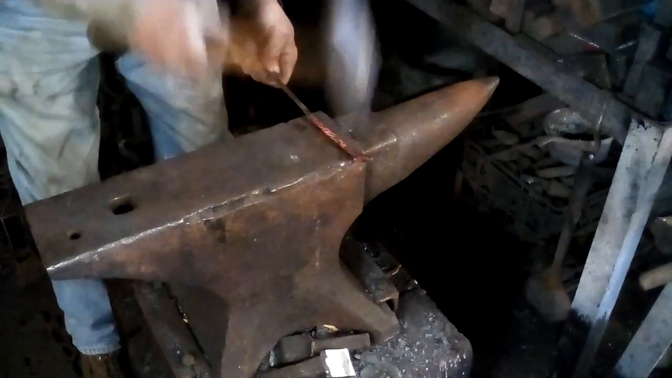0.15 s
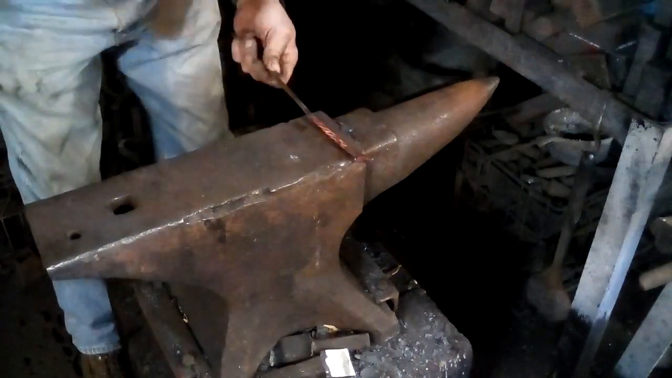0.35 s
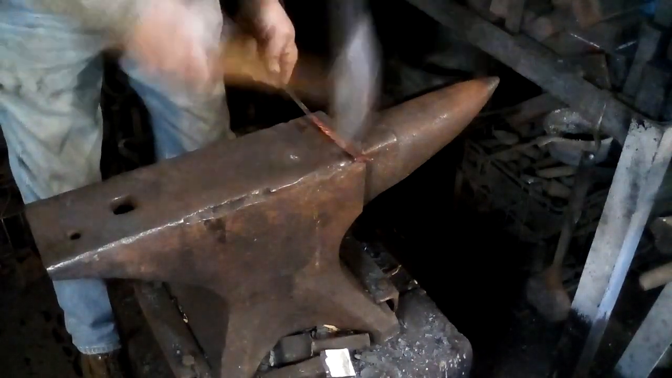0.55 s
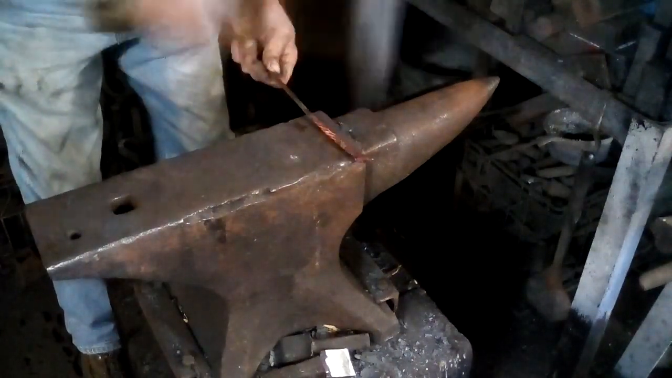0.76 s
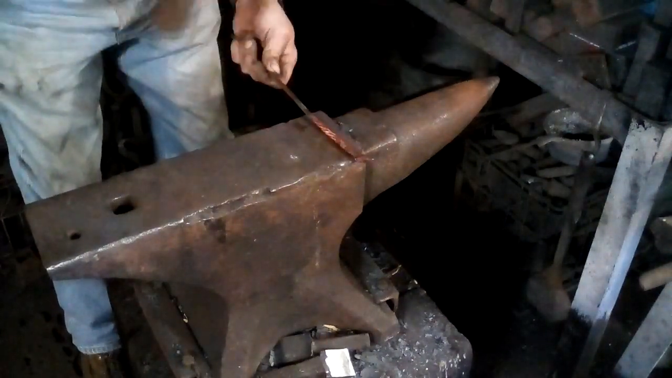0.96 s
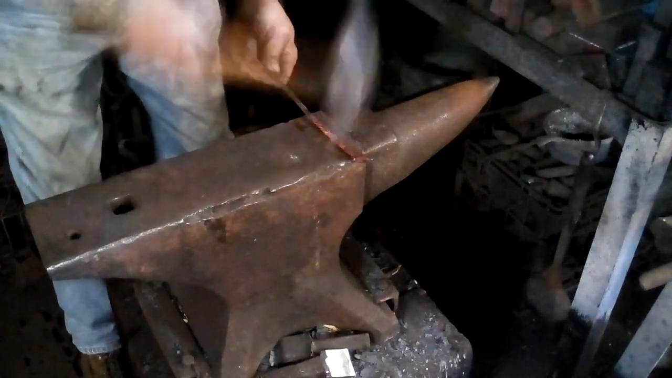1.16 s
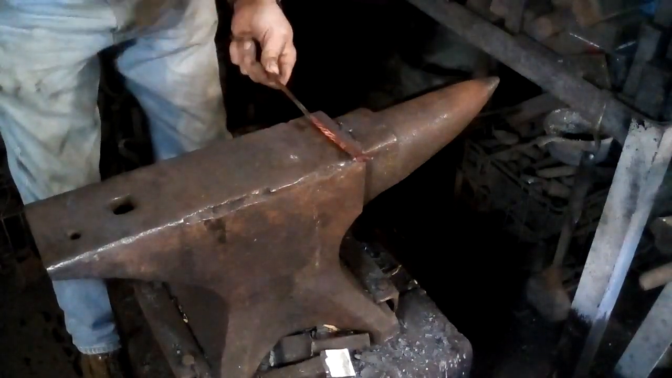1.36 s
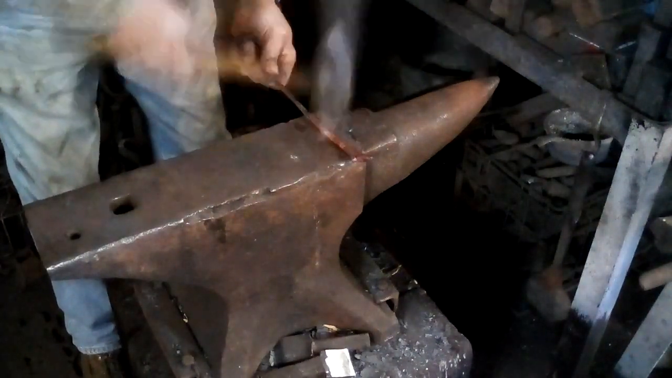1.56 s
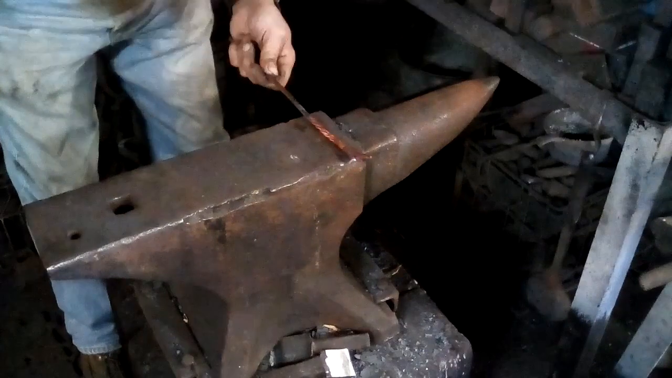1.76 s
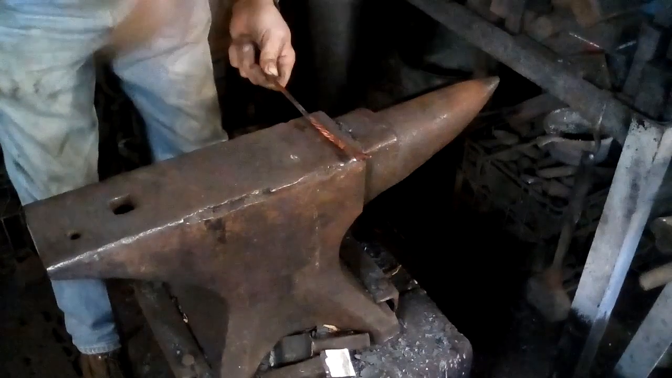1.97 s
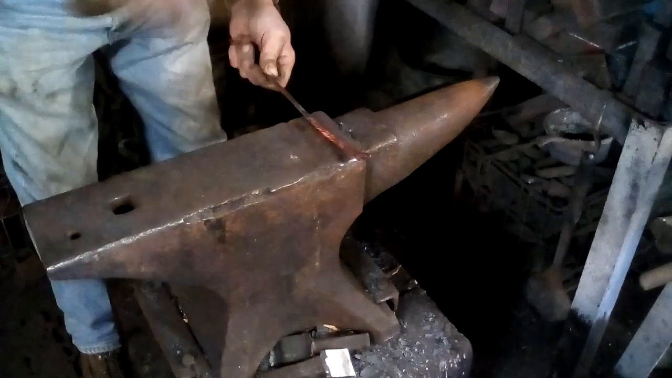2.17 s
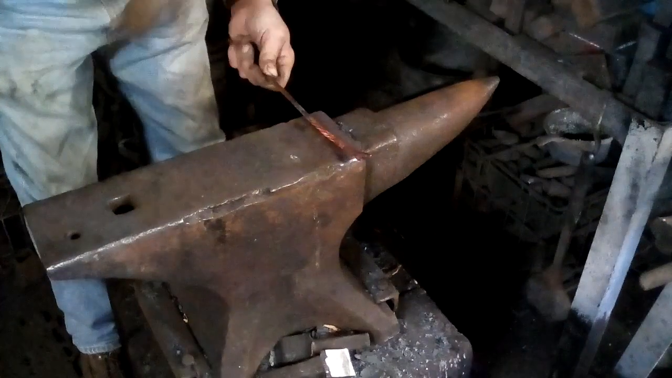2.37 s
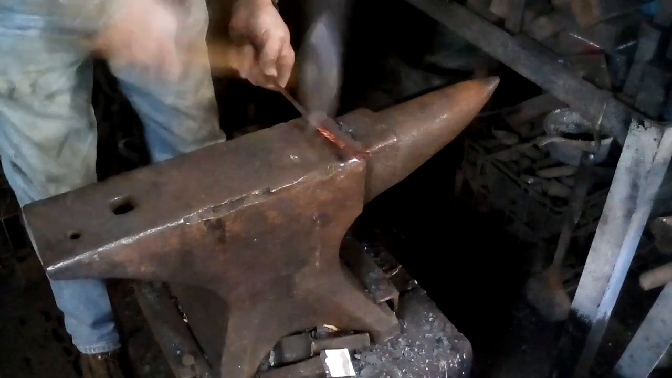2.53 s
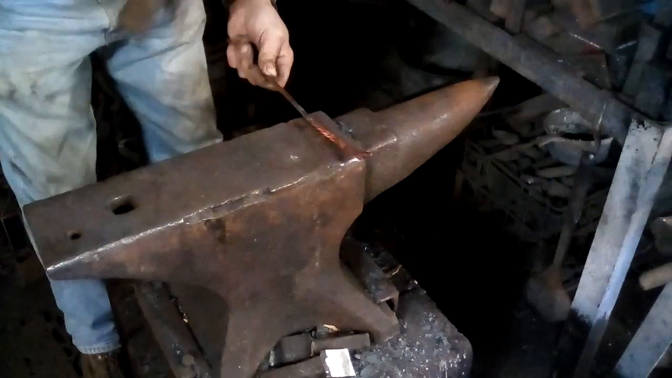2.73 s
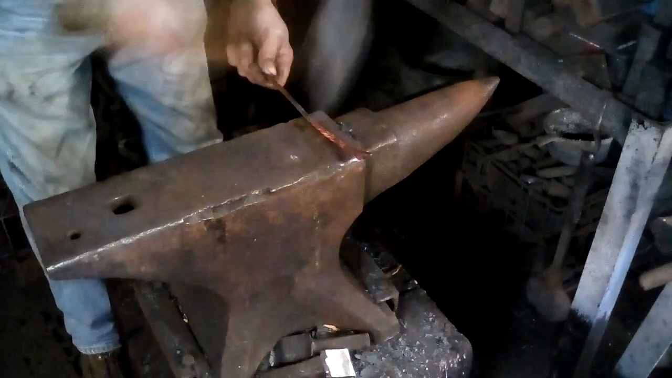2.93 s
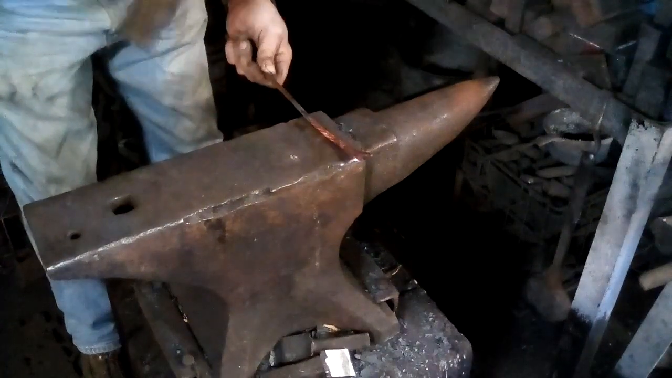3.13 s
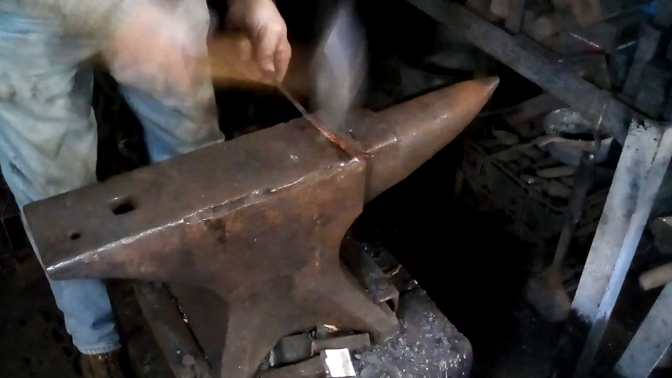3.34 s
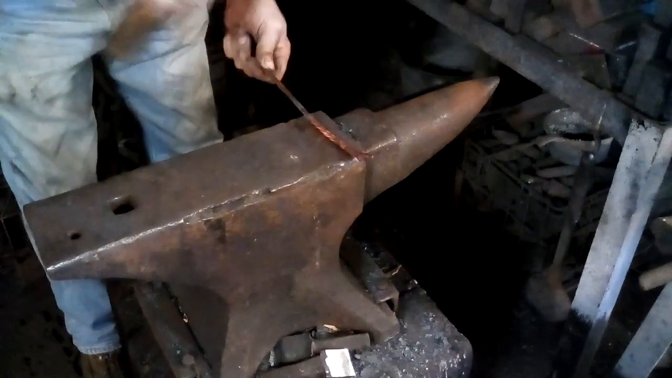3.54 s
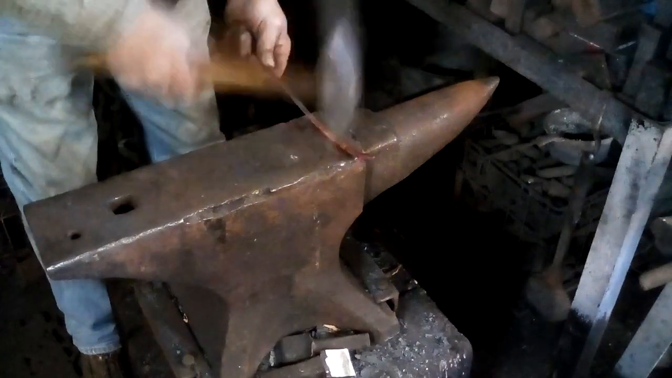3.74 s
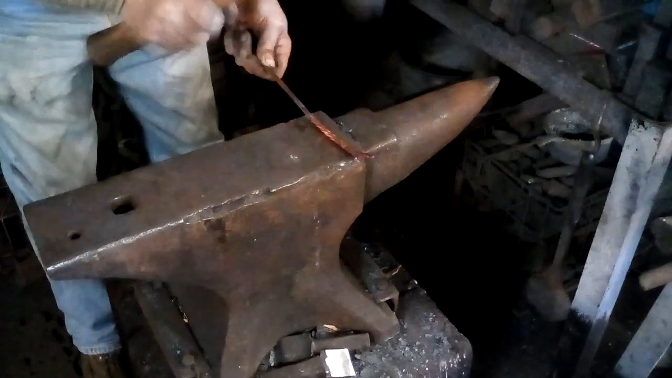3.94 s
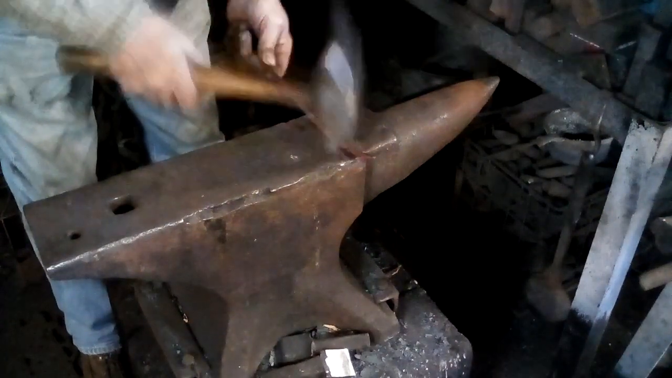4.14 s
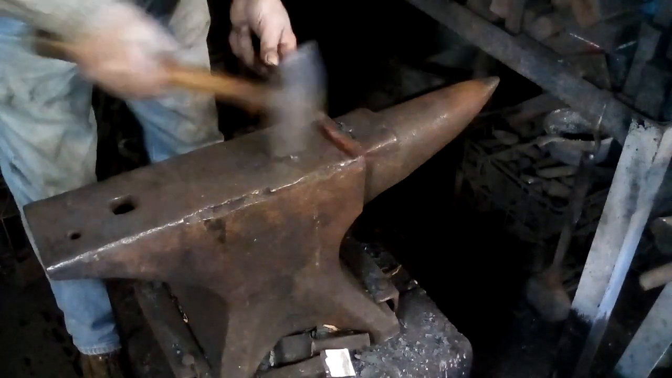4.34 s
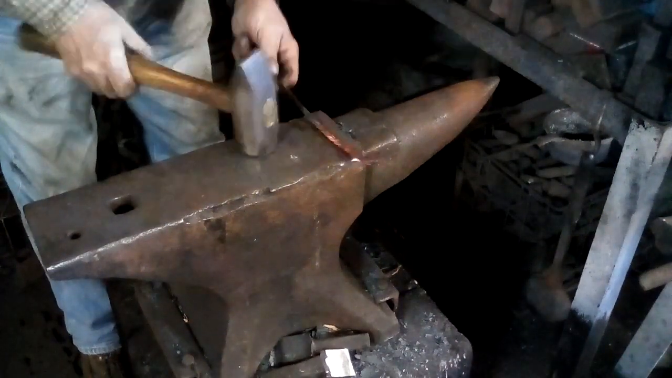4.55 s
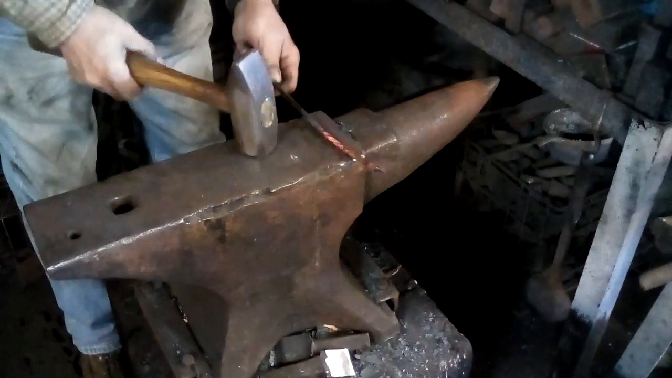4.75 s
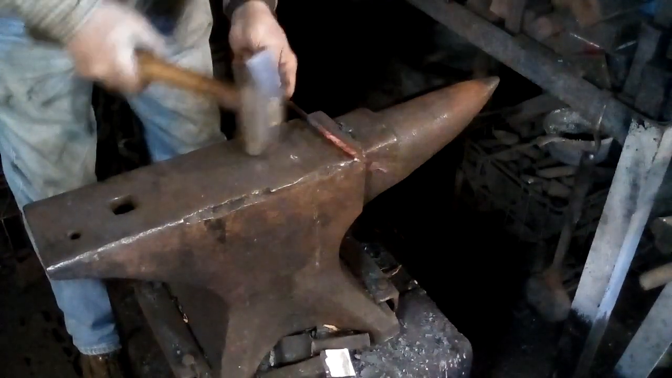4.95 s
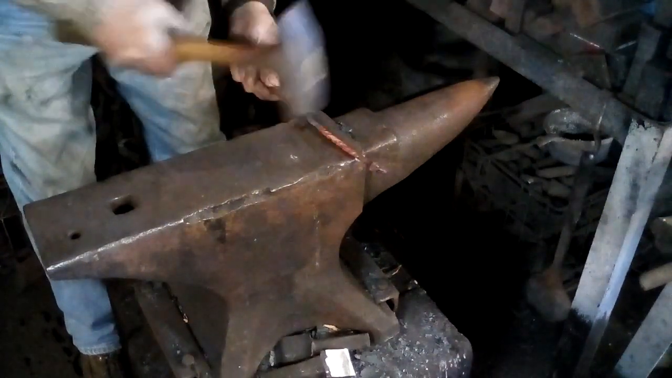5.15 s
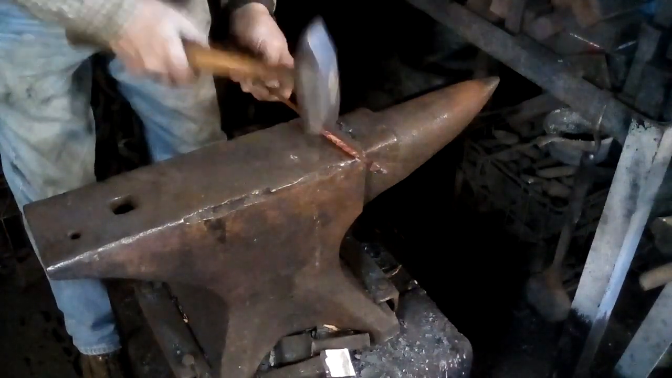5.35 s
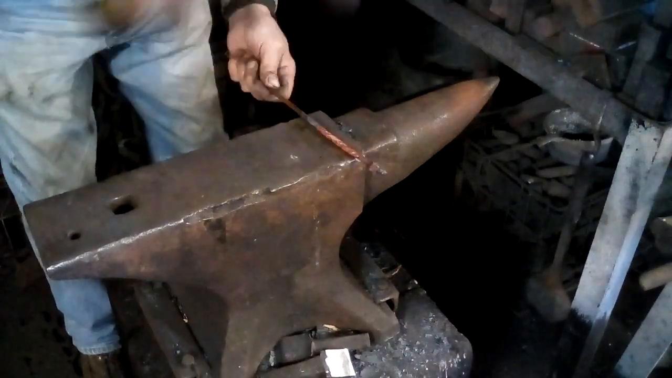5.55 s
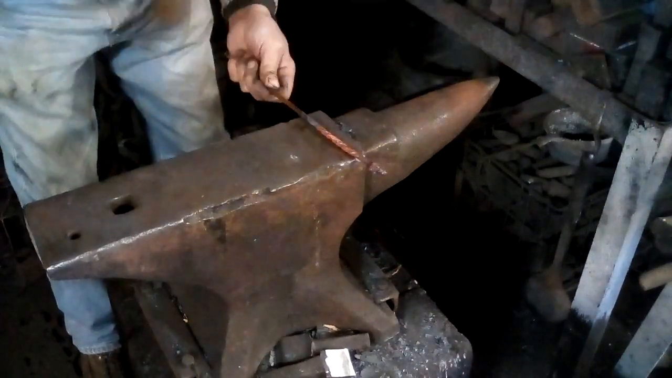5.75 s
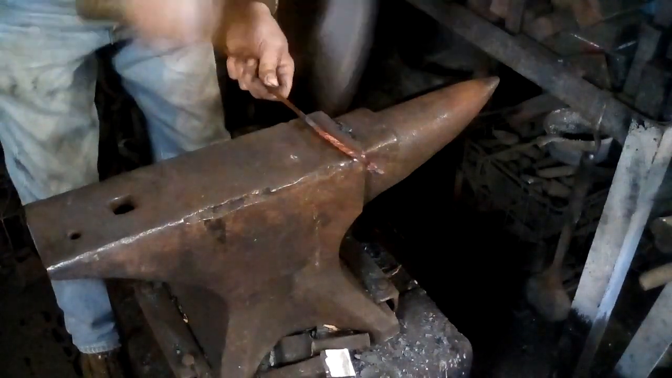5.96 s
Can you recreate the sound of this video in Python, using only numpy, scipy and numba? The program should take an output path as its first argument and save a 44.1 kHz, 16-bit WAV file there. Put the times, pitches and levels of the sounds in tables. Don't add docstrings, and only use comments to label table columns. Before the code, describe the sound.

A small microphone sits about a metre from an anvil in a stone workshop, over quiet low draught and thin hiss. A light rod knock sounds at 0.0 s. Hard hammer blows follow at about 0.7, 1.2, 1.6, 2.1, 2.5, 2.95, 3.4 and 3.8 s: sharp clank, short stump thud, steely shimmer and a dense tail under a second. Ringing grows through the fourth and fifth; the sixth is hardest, with a long, clear high ring, and the next is duller. A soft, thuddy blow lands at 4.2 s. The hammer bounces three times on bare steel at 4.45, 4.52 and 4.56 s, the last weakest. Faint cloth rustles near 5.0 s, a light tap rocks the stand at 5.4 s, cloth moves again at 5.7 s, and a full blow falls at 5.94 s, cut off early. Peaks are squashed, tails swell back, and a very faint high whistle briefly precedes blows.

```python
import sys
import numpy as np
from scipy import signal
from scipy.fft import rfft, irfft, next_fast_len
from scipy.io import wavfile
from scipy.ndimage import uniform_filter1d, minimum_filter1d
from numba import njit

SR = 44100
rng = np.random.default_rng(int(sys.argv[2]) if len(sys.argv) > 2 else 0)


def natural_amplitude(level_db):
    exponent = np.asarray(level_db, float) / 20
    return 10 ** exponent


def materialize(psi):
    bounded = np.clip(np.atleast_2d(psi).T, -1, 1)
    quanta = np.round(bounded * 32767).astype(np.int16)
    wavfile.write(sys.argv[1], SR, quanta)


N = 269010

BLOCK_S = 0.02
RING_S = 0.75
FLIGHT_S = 0.0016
SCATTER_DB = 1.5
TAIL_PER_PEAK = 0.84

# f/Hz, density/dB per Hz
AIR_SPECTRUM = [(25, -24), (60, -6), (150, -0.5), (240, -3), (420, -7.5), (700, -14), (1800, -19),
                (3000, -22.5), (4000, -21), (6500, -26.5), (9000, -36), (15000, -27.5)]
# f/Hz, level/dB
WHISTLE_TONES = [(6800, -67.5), (14700, -69.5)]
# middle t/s, half length/s, level/dB
RUSTLES = [
    (4.996, 0.16, -62),
    (5.716, .1, -57),
]
# f/Hz, density/dB per Hz
CLOTH_SPECTRUM = [(100, -10), (400, -6), (1200, -20), (2600, -13), (3300, -18), (4000, -5.5), (5200, -16),
                  (8000, -40)]

# f/Hz, density/dB per Hz
BLOW_TAIL = [(40, -18.5), (100, -6.5), (200, -3), (570, -0.5), (900, -2.5), (1400, -6.5), (2100, -3),
             (3000, -13), (3800, -10), (5200, -16.5), (7500, -26.5), (10000, -26), (15000, -27)]
SKIP_TAIL = [(40, -27.5), (115, -7.5), (200, 1.5), (640, -5), (1200, -9), (2400, -6.5), (3300, -9.5),
             (4300, -19), (5500, -19.5), (7500, -44), (10000, -45), (15000, -68.5)]
KNOCK_TAIL = [(40, -19), (120, 0), (300, -2), (700, -4.5), (1400, -13.5), (3000, -18), (4400, -22.5),
              (6500, -25), (10000, -27), (15000, -20.5)]
ROCK_TAIL = [(40, -20), (120, -0.5), (300, -9.5), (700, -17), (1400, -31.5), (3000, -28.5), (4400, -20),
             (6500, -23), (10000, -25.5), (15000, -19.5)]
# f/Hz, t60/s
TAIL_T60 = [(80, 0.92), (300, 0.64), (1500, 0.55), (4000, 0.52), (8000, 0.31), (15000, 0.19)]
# delay/s, spread/s, level/dB
FAR_WALL = (0.08, 0.012, 1)
# f/Hz, width/Hz, level/dB
ANVIL_MODES = [(351.4, 43, 3), (572, 26, 4.5), (888, 52, 4), (1272, 20, 4.5), (1885, 110, 6.5),
               (2321, 63, 5), (3518, 45, 6.5), (4020, 275, 8), (6270, 160, 13.5), (9780, 180, 9.5),
               (10830, 100, 1), (12300, 200, -5.5), (6990, 380, 7)]

# t/s, peak level/dB, head ring level/dB, thud level/dB, crack level/dB
BLOWS = [
    (0.694, -7, -33.5, 8, 11),
    (1.17, -3.5, -36.5, 5, 5),
    (1.618, -3.5, -33.5, 5.5, 6),
    (2.07, -2.5, -24.5, 4.5, 8.5),
    (2.511, -3, -22.5, 5, 4.5),
    (2.953, 3, -18.5, -7, 1),
    (3.381, -0.5, -38.5, -2.5, 8),
    (3.801, -1.5, -33.5, -3, 4.5),
    (4.194, -14, -38.5, 12, 8.5),
    (5.935, -4.5, -30, 7.5, 9),
]
SKIPS = [
    (4.445, -2, -43, -16, 3),
    (4.5205, 1.5, -41, -19, 6.5),
    (4.564, -8, -42, -10, -2),
]
GLANCES = [
    (0.017, -14, -46, 3.3, 0.1),
    (5.383, -8.5, -31, 0.1, 0.086),
]

# f/Hz, width/Hz, level/dB
BLOW_CLANK = [(1580, 150, -3.5), (2020, 120, -4.5), (2232, 395, 3.5), (3110, 130, -19), (3480, 120, -13.5),
              (3965, 230, -6), (5640, 130, -14), (6280, 210, -20), (6900, 560, -21)]
SKIP_CLANK = [(1007, 350, -29), (1680, 810, 2.5), (2157, 410, 0.5), (3000, 600, -30), (3680, 450, -5),
              (3990, 320, 3), (5500, 600, -6)]
KNOCK_CLANK = [(1070, 700, -3.5), (1580, 1200, -21), (2120, 150, 4), (4140, 410, 9), (7040, 560, 17),
               (7900, 520, -14)]
ROCK_CLANK = [(690, 150, -29), (1410, 400, -23), (2080, 270, -15.5), (4180, 410, -3), (5200, 360, -6),
              (6530, 190, -5), (6700, 560, -16)]
# f/Hz, level/dB, t60/s
STUMP = [(111, -34, 0.22), (166, -20.5, 0.15), (258, -19, 0.044), (435, -9, 0.012)]
ROD_KNOCK = [(167.6, -13, 0.08), (293, -8.5, 0.11), (490, -31, 0.041), (1070, -9, 0.027),
             (1500, -10, 0.034)]
STAND_ROCK = [(109.6, -12, 0.28), (160, -10, 0.11), (259, -11, .08)]
# f/Hz, level/dB, t60/s
BLOW_RING = [(6300, -32, 0.23), (10300, -43.5, 0.14), (11100, -44, 0.28)]
SKIP_RING = [(6500, -27, 0.15), (9870, -25, 0.14), (10940, -26, 0.08), (12200, -36, .05), (14500, -47, .04)]
# f/Hz, level/dB, t60/s
HEAD_RING = [(4601, 7.5, 0.7), (4606, -4.5, 0.32)]

# f/Hz, level/dB
CAPSULE_RESPONSE = [(20, 11.5), (50, -14), (95, -2), (7500, -4), (8600, -14), (13900, -10.5), (14400, -5.5),
                    (15000, -0.5), (15700, -7)]


def on_log_axis(table, hz):
    f, value = np.transpose(table)
    return np.interp(np.log(np.maximum(hz, 1)), np.log(f), value)


def colour(x, table):
    gain = natural_amplitude(on_log_axis(table, np.fft.rfftfreq(len(x), 1 / SR)))
    y = irfft(rfft(x) * gain, len(x))
    return y / np.sqrt(np.mean(y ** 2))


def fall(t, t60):
    return np.exp(-np.log(1000) * t / t60)


def rise(t, rise_s):
    return 1 - np.exp(-t / rise_s)


def workshop_air():
    k = SR // 10
    air = rfft(colour(rng.standard_normal(N), AIR_SPECTRUM))
    octave = np.log2(np.maximum(np.fft.rfftfreq(N, 1 / SR), 30) / 30)
    steps = np.repeat(rng.standard_normal((11, N // k + 1)), k, axis=1)
    walk = uniform_filter1d(uniform_filter1d(steps, k), k)[:, :N]
    drift = natural_amplitude(3.5 * walk)
    bands = (drift[b] * irfft(air * np.clip(1 - abs(octave - b), 0, 1), N) for b in range(11))
    return natural_amplitude(-56) * sum(bands)


def whistle(chirp_db, chirp_s):
    t = np.arange(N) / SR
    onsets_s = [row[0] for row in [*BLOWS, *GLANCES[:1]]]
    gate = sum((t > s - s % BLOCK_S) & (t < s) for s in onsets_s)
    chirp = natural_amplitude(chirp_db * np.exp(-(t % BLOCK_S) / chirp_s))
    tones = sum(natural_amplitude(db) * np.sin(2 * np.pi * hz * t) for hz, db in WHISTLE_TONES)
    return uniform_filter1d(gate * chirp, 40) * tones


def rustle():
    t = np.arange(N) / SR
    swell = sum(natural_amplitude(db) * np.exp(-0.5 * ((t - s) / half_s) ** 2) for s, half_s, db in RUSTLES)
    grain = natural_amplitude(30 * uniform_filter1d(rng.standard_normal(N), 400))
    return swell * grain * colour(rng.standard_normal(N), CLOTH_SPECTRUM)


def walls(t, tail, anvil):
    hz = np.fft.rfftfreq(len(t), 1 / SR)
    spec = rfft(colour(rng.standard_normal(len(t)), tail))
    peaks_db = sum(db / (1 + (2 * (hz - f) / width) ** 2) for f, width, db in ANVIL_MODES)
    spec = spec * natural_amplitude(anvil * peaks_db)
    delay_s, spread_s, wall_db = FAR_WALL
    late = natural_amplitude(wall_db * np.exp(-0.5 * ((t - delay_s) / spread_s) ** 2))
    half_octave = 2 * np.log2(np.maximum(hz, 1) / 40)
    out = 0
    for k in range(19):
        band = irfft(spec * np.clip(1 - abs(half_octave - k), 0, 1), len(t))
        out = out + band * fall(t, on_log_axis(TAIL_T60, 40 * 2 ** (k / 2)))
    return rise(t, 0.0013) * late * out


def room_answer(here, beside, thud_db, crack_db):
    lows = signal.butter(1, 700, fs=SR)
    highs = signal.butter(2, 6000, "high", fs=SR)
    spot = 0.28 * rng.standard_normal()
    wet = np.cos(spot) * here + np.sin(spot) * beside
    wet = wet + (natural_amplitude(thud_db / 2) - 1) * signal.lfilter(*lows, wet)
    return wet + (natural_amplitude(crack_db / 2) - 1) * signal.lfilter(*highs, wet)


def ring(modes, t):
    chance = rng.standard_normal(len(modes))
    out = 0
    for k, (hz, db, t60) in enumerate(modes):
        level = (-1) ** k * natural_amplitude(db + SCATTER_DB * chance[k])
        out = out + level * np.sin(2 * np.pi * hz * t) * fall(t, t60)
    return out


def support_thud(t, base, thud_db):
    thud = natural_amplitude(thud_db) * rise(t, 0.00096) * ring(base, t)
    return thud + 0.25 * np.roll(thud, int(0.1 * SR))


def contact_clank(t, clank, tail, grit, crack_db, scale_db, tick_db, top_db):
    mids = signal.butter(2, 900, "high", fs=SR)
    highs = signal.butter(2, 6000, "high", fs=SR)
    dull = signal.butter(4, 7000, fs=SR)
    modes = [(hz, db, 4.5 / width) for hz, width, db in clank]
    x = rise(t * natural_amplitude(crack_db / 2), 0.00025) * ring(modes, t)
    crunch = signal.lfilter(*mids, colour(grit, tail)) * fall(t, 0.024)
    x = x / abs(x).max() + natural_amplitude(scale_db) * crunch
    x = x + 0.62 * np.roll(x, int(0.0022 * SR)) + 0.34 * np.roll(x, int(0.0042 * SR))
    top_gain = natural_amplitude(min(crack_db + top_db, 0) * 2)
    x = x + (top_gain - 1) * (x - signal.lfilter(*dull, x))
    return x + natural_amplitude(crack_db + tick_db) * signal.lfilter(*highs, grit) * fall(t, 0.0073)


def thin_ring(t, rings, flutter, level_db):
    return natural_amplitude(level_db) * rise(t, 0.0005) * (1 + 0.46 * flutter) * ring(rings, t)


def head_ring(t, flutter, ring_db, grip_s):
    waver = natural_amplitude(0.53 * uniform_filter1d(flutter, 1500) * 2)
    grip = np.exp(-(t / grip_s) ** 2)
    return natural_amplitude(ring_db) * rise(t, 0.012) * grip * waver * ring(HEAD_RING, t)


def strikes(events, clank, rings, base, tail, drive_db, tail_db, thin_db, scale_db, tick_db,
            grip_s, anvil, top_db):
    t = np.arange(int(RING_S * SR)) / SR
    out, head = np.zeros((2, N + 2 * len(t)))
    here, beside = walls(t, tail, anvil), walls(t, tail, anvil)
    for s, peak_db, ring_db, thud_db, crack_db in events:
        grit = rng.standard_normal(len(t))
        flutter = uniform_filter1d(uniform_filter1d(grit, 500), 500) * 28
        direct = contact_clank(t, clank, tail, grit, crack_db, scale_db, tick_db, top_db)
        direct = direct + support_thud(t, base, thud_db)
        wet = room_answer(here, beside, thud_db, crack_db)
        wet = wet + thin_ring(t, rings, flutter, crack_db + thin_db)
        i = int((s + FLIGHT_S) * SR)
        span = slice(i, i + len(t))
        out[span] += natural_amplitude(peak_db) * direct + natural_amplitude(tail_db + TAIL_PER_PEAK * peak_db) * wet
        head[span] = head[span] * fall(t, 0.02) + head_ring(t, flutter, ring_db, grip_s)
    return natural_amplitude(drive_db) * (out + head)[:N]


def scene():
    knock = strikes(GLANCES[:1], KNOCK_CLANK, BLOW_RING, ROD_KNOCK, KNOCK_TAIL,
                    drive_db=-1.5, tail_db=-15, thin_db=-15, scale_db=4, tick_db=-2,
                    grip_s=0.2, anvil=0.9, top_db=3)
    rock = strikes(GLANCES[1:], ROCK_CLANK, BLOW_RING, STAND_ROCK, ROCK_TAIL,
                   drive_db=-6, tail_db=-16.5, thin_db=-15, scale_db=-1.5, tick_db=4.5,
                   grip_s=0.19, anvil=0.48, top_db=3)
    skips = strikes(SKIPS, SKIP_CLANK, SKIP_RING, STAND_ROCK, SKIP_TAIL,
                    drive_db=0, tail_db=-19, thin_db=1, scale_db=-5, tick_db=-46,
                    grip_s=0.24, anvil=0.68, top_db=-7)
    hard = strikes(BLOWS, BLOW_CLANK, BLOW_RING, STUMP, BLOW_TAIL,
                   drive_db=11.5, tail_db=-17.5, thin_db=-2.5, scale_db=-8, tick_db=-17.5,
                   grip_s=0.28, anvil=1.06, top_db=3)
    return (workshop_air() + rustle() + knock + rock + skips + hard)[None]


def capsule(x):
    size = next_fast_len(N + SR // 2)
    gain = natural_amplitude(on_log_axis(CAPSULE_RESPONSE, np.fft.rfftfreq(size, 1 / SR)))
    cepstrum = irfft(np.log(gain), size)
    fold = np.r_[1, 2 * np.ones(size // 2 - 1), np.zeros(size - size // 2)]
    return irfft(rfft(x, size) * np.exp(rfft(cepstrum * fold)), size)[:N]


@njit
def follow(size, keep):
    e, out = 0., np.empty(len(size))
    for i in range(len(size)):
        e = max(size[i], e * keep)
        out[i] = e
    return out


def limiter(x, top_db, ratio, hold_s, release_s):
    block, hold = int(BLOCK_S * SR), int(hold_s * SR)
    loudest = np.repeat(np.maximum.reduceat(abs(x), np.arange(0, N, block)), block)[:N]
    recent = -minimum_filter1d(-abs(x), hold + 1, origin=hold // 2)
    level = follow(np.maximum(loudest, recent), np.exp(-1 / (release_s * SR)))
    gain = np.minimum(1, (natural_amplitude(top_db) / (level + 1e-9)) ** (1 - 1 / ratio))
    return x * uniform_filter1d(gain, 60)


def band_limit(x):
    return signal.sosfilt(signal.butter(12, 17020, fs=SR, output="sos"), x)


def record(dry):
    x = limiter(capsule(dry[0]), top_db=-10, ratio=2.79, hold_s=0.032, release_s=0.039)
    x = x + whistle(chirp_db=9.5, chirp_s=0.003)
    top_cut = signal.ellip(8, 0.3, 40, 15750, fs=SR, output="sos")
    mix = signal.sosfilt(top_cut, x)[None]
    return band_limit(mix)


dry = scene()
out = record(dry)
materialize(out)
```